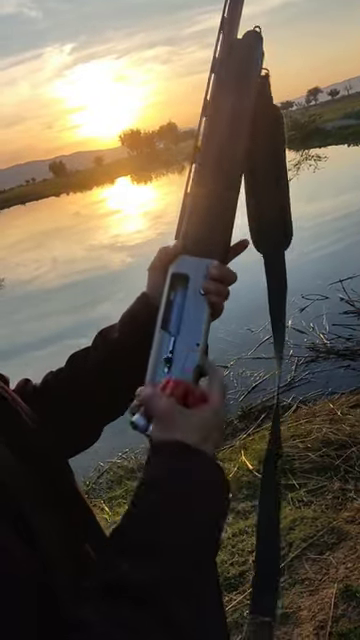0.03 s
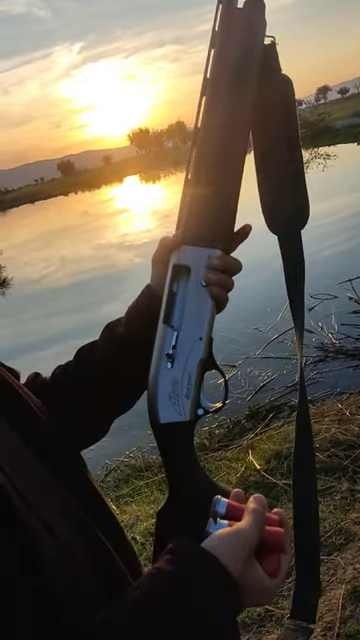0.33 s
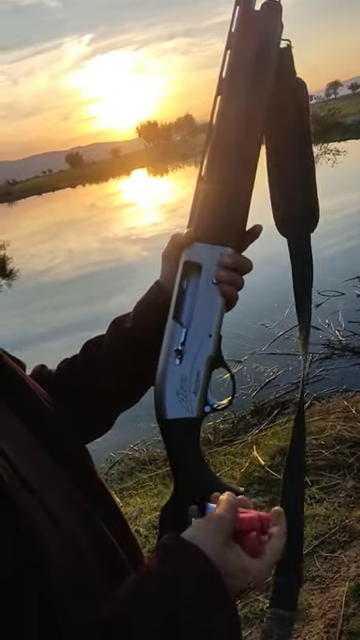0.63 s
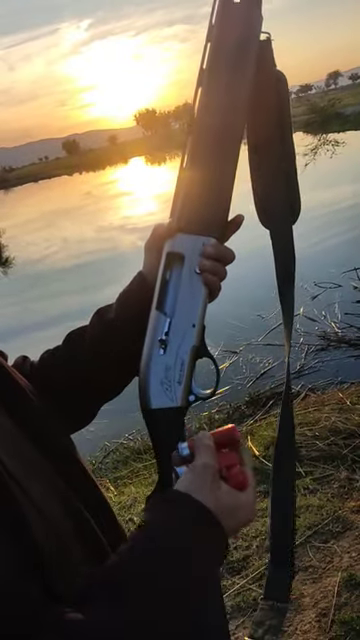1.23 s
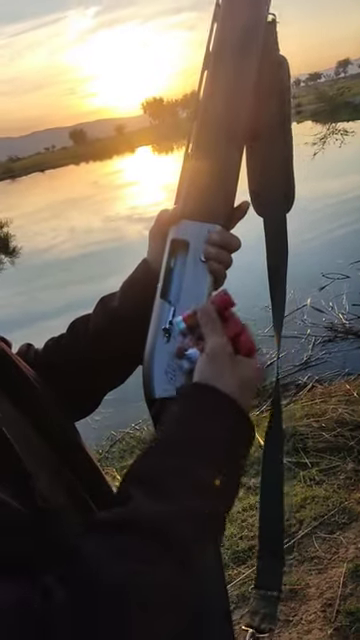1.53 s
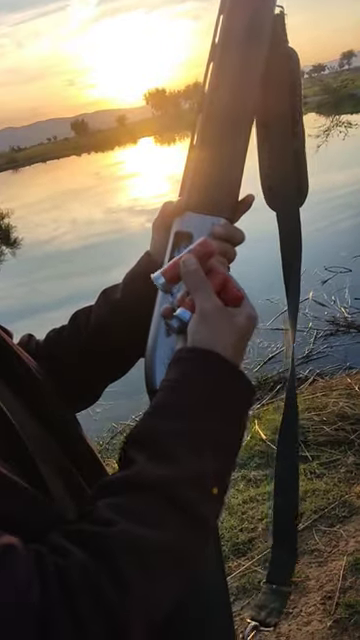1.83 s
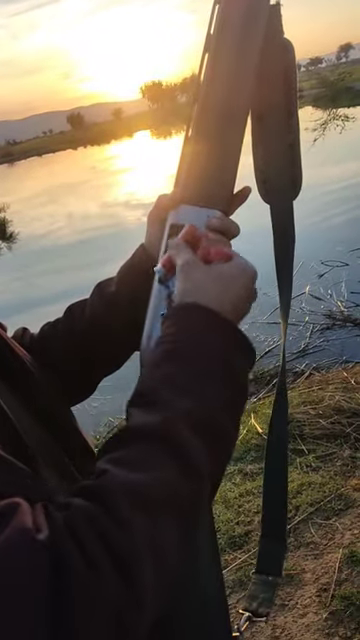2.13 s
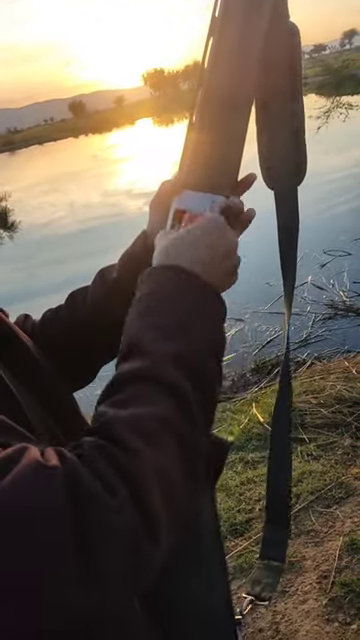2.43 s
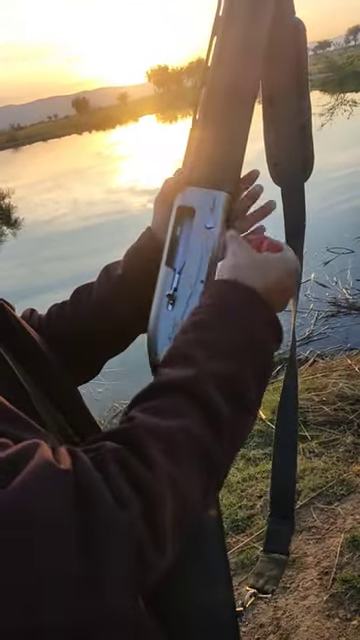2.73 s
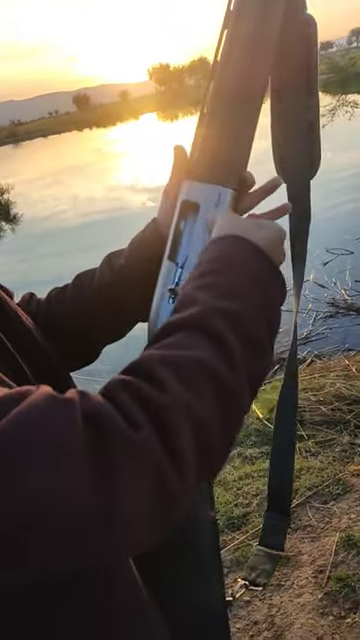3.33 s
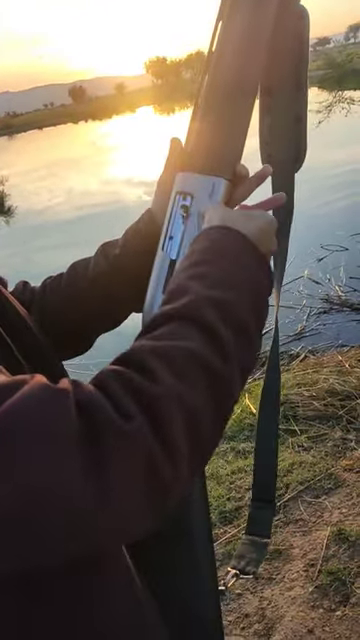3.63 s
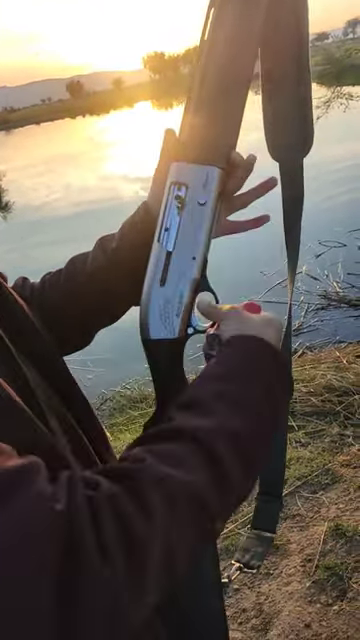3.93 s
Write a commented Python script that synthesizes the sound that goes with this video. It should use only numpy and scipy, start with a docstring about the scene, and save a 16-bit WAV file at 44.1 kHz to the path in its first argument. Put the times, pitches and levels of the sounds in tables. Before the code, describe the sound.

A shotgun being loaded outdoors: shells click lightly, then the bolt slams shut.

```python
"""A shotgun is loaded at arm's length beside a quiet lake.
First, shells click together in the hand: brass rims tick, plastic hulls clack, fingers rub.
Around 2.5 s one is pushed into the port and rattles home. At 3.5 s the bolt is released, scrapes
forward and slams shut, ringing the steel, thumping the stock and sending out a puff of air.
Faint birds call far off in the gaps, and an outdoor hush lies under it all."""
import sys
import numpy as np
from scipy import signal
from scipy.fft import rfft, irfft
from scipy.io import wavfile
from scipy.ndimage import uniform_filter1d

SR = 44100
rng = np.random.default_rng(int(sys.argv[2]) if len(sys.argv) > 2 else 0)


def dump(signal):
    """Clip the signal to [-1, 1] and save it as 16-bit WAV at the path in sys.argv[1]."""
    limited = np.clip(np.atleast_2d(signal).T, -1, 1)
    pcm = np.round(limited * 32767).astype(np.int16)
    wavfile.write(sys.argv[1], SR, pcm)


N = 176400

# shell contacts (time [s], tick level [dB], tick pitch [Hz], clack level [dB], knock level [dB],
# knock pitch [Hz], t60 [s], pan to the left [dB])
SHELL_CLICKS = [(0.0101, -20.5, 7520, -25.5, -29, 1630, 0.021, -1.5),
                (.2711, -45.5, 8000, -42.5, -42, 2420, 0.013, -2.5),
                (.325, -48.5, 7300, -63, -43.5, 2750, 0.014, 1),
                (0.4146, -34, 7900, -47.5, -46, 4180, 0.0088, 2),
                (.558, -51.5, 7400, -48.5, -50.5, 2660, .06, 0),
                (0.8899, -57, 7600, -56.5, -50, 1260, 0.022, -2),
                (0.9283, -57, 7600, -57, -55, 2900, 0.028, -1),
                (1.036, -43.5, 7600, -53, -54, 2500, 0.016, -2),
                (1.9713, -45.5, 7350, -67, -68, 1600, .008, -10),
                (2.381, -45.5, 7700, -43, -38, 1660, 0.031, -2),
                (2.4561, -36.5, 6900, -36, -37.5, 4120, 0.012, -2.5),
                (2.4713, -37, 6900, -41.5, -46, 3280, 0.013, 0),
                (2.5019, -24.5, 8400, -34, -30.5, 1740, 0.019, -3),
                (2.5253, -23.5, 6660, -32, -30.5, 1680, .023, -1),
                (2.577, -41, 7000, -50, -52, 1610, 0.025, -16),
                (2.5813, -38.5, 7940, -37, -40.5, 1590, .037, -1),
                (2.6474, -25, 6300, -32, -49.5, 1030, 0.015, -6),
                (2.6957, -38.5, 7260, -49, -51.5, 1090, 0.015, -7),
                (2.734, -44.5, 6850, -45, -40, 1060, 0.028, 2.5),
                (2.808, -56.5, 7000, -54.5, -47, 1070, 0.026, -4)]
# tone of a brass rim (frequency [Hz], gain [dB])
TICK_EQ = [(3500, -17.5), (5200, -7), (6300, 5.5), (7200, 4.5), (8600, -1.5), (9400, -11), (12500, -14.5),
           (15500, -32.5)]
# tone of a plastic hull (frequency [Hz], gain [dB])
CLACK_EQ = [(100, -36), (300, -12), (1200, -17.5), (2200, -4), (3800, -2), (5500, -4), (8000, -4.5),
            (15000, -50.5)]
TICK_WIDTH_HZ, KNOCK_WIDTH_HZ, KNOCK_STRETCH = 1450, 374, 1.6

# blows of bolt and carrier (time [s], level [dB], ping pitch [Hz], t60 [s], pan to the left [dB])
BOLT_BLOWS = [(3.5425, -37.5, 1000, .027, -7), (3.5589, -19.5, 6150, 0.03, -4.5),
              (3.5675, -26, 7500, .016, 0), (3.5751, -21, 7250, 0.011, -7), (3.5835, -23, 5200, 0.012, -3),
              (3.587, -18.5, 4340, 0.015, 2), (3.6002, -21, 7300, 0.028, -1),
              (3.6059, -21.5, 6600, 0.023, -3), (3.6147, -20.5, 7300, .016, -10),
              (3.622, -17, 3900, 0.031, 15), (3.625, -15, 1300, 0.023, 2), (3.705, -51, 8300, .07, -9)]
PING_WIDTH_HZ, PING_DB = 440, 7.5
SLIDE_S, LOCK_S, SLIDE_DB, SLIDE_RISE_DB = 3.560, 3.634, -26.5, 10.5
SLIPS_PER_S, SLIP_SPREAD_DB = 1400, 3
# tone of steel on steel (frequency [Hz], gain [dB])
STEEL_EQ = [(100, -37), (400, -17), (1000, -1), (3000, -4), (4200, 0), (5300, -6), (6200, 4), (7300, 6.5),
            (8500, -3), (10500, -10.5), (15500, -21.5)]
# resonances of the receiver (pitch [Hz], gain [dB], t60 [s])
RECEIVER_MODES = [(640, -2, .066), (1067, 0.5, .035), (1420, -7, 0.047), (2715, 2, 0.036), (7094, 9, 0.37),
                  (7150, -1, .15), (8597, 8, 0.15), (10880, 3, 0.093)]
# decay of the barrel's diffuse ring (frequency [Hz], average t60 [s])
RING_DECAY = [(1000, 0.079), (8000, 0.12)]
RING_DB, RING_SPREAD_DB, RING_LOW_HZ, TOP_HZ = -8.5, 7, 804, 15600

# heavy thumps through the stock (time [s], level [dB], t60 [s])
STOCK_THUMPS = [(0.0115, -33, 0.039), (2.5830, -44, .05), (3.5770, -30, 0.056), (3.6236, -18.5, 0.038),
                (3.6300, -17.5, 0.036)]
# tone of the stock (frequency [Hz], gain [dB])
STOCK_EQ = [(40, -25), (150, -11), (300, 0), (430, -9.5), (650, 1.5), (850, -4.5), (1350, -1.5), (2400, -1),
            (12000, -51)]
# soft bumps of the hand on the gun (time [s], level [dB])
HAND_BUMPS = [(.774, -55), (2.583, -52)]
BUMP_HZ, BUMP_WIDTH_HZ, BUMP_T60 = 205, 120, 0.15
PUFF_S, PUFF_DB, PUFF_RISE_S, PUFF_FALL_S, MIC_LOW_HZ = 3.629, -12, .005, 0.14, 3.17

# strokes of fingers and sleeve on the shells (time [s], length [s], level [dB])
RUB_STROKES = [(.36, 0.28, -60), (.87, 0.24, -55.5), (2.3, 0.36, -63)]
# tone of the rubbing (frequency [Hz], gain [dB])
RUB_EQ = [(200, -6), (800, 1), (5000, 1.5), (7800, 11.5), (10000, -22.5), (15000, -26)]

# envelope of every contact: attack, hard first snap, faint after-ring
ATTACK_S, SNAP_DB, SNAP_T60, AFTER_DB, AFTER_STRETCH = 0.00018, -1, 0.0025, -26, 4.5
# stereo image of the nearby gun (frequency [Hz], pan to the left [dB])
GUN_BALANCE = [(300, -1), (1200, 2), (2800, 4.5), (5500, -6.5), (9000, 1)]
LEFT_LAG_S, STEREO_LIKENESS = .00022, 0.65

# decay of the scatter from the bank (frequency [Hz], t60 [s])
BANK_DECAY = [(2000, 0.43), (7000, 1)]
BANK_DB, BANK_TOP_HZ = -30.5, 9000
# distant calls (time [s], length [s], start pitch [Hz], middle pitch [Hz], end pitch [Hz], level [dB])
BIRD_CALLS = [(0.614, 0.039, 650, 561, 517, -51.5), (1.22, 0.07, 517, 425, 477, -56.5),
              (2.135, 0.0454, 593, 639, 700, -55), (3.11, 0.067, 3400, 4120, 3940, -63)]
# tone of the open air (frequency [Hz], gain [dB])
AIR_EQ = [(20, 9.5), (45, -16.5), (130, -8.5), (330, -11), (550, -2), (1200, -3), (2500, -12.5),
          (5000, -16.5), (7000, -10.5), (8300, -17), (9300, -27), (10200, -42.5), (15000, -53)]
# stereo width of the open air (frequency [Hz], left-right likeness [0-1])
AIR_STEREO = [(40, 0.17), (700, 0.73), (2500, 0.097)]
AIR_DB, AIR_PATCHY_DB, AIR_SWELL_DB = -55.5, 2.5, -0.53


def shells():
    """Brass rims tick, plastic hulls clack, and the hollow they strike knocks."""
    out = np.zeros((2, N))
    for s, tick_db, tick_hz, clack_db, knock_db, knock_hz, t60, pan_db in SHELL_CLICKS:
        hollow = resonate(contact(t60 * KNOCK_STRETCH), knock_hz, KNOCK_WIDTH_HZ)
        knock = at_level(resonate(hollow, knock_hz, width_hz=knock_hz), knock_db)
        rim = resonate(contact(t60), tick_hz, TICK_WIDTH_HZ)
        tick = at_level(equalise(rim, TICK_EQ), tick_db)
        clack = at_level(equalise(contact(t60), CLACK_EQ), clack_db)
        add(out, s, pan(pan_db) * (tick + clack + knock))
    return out


def bolt():
    """Blows and a scrape of steel on steel ring the receiver and the barrel."""
    drive = np.zeros((2, N))
    for s, db, ping_hz, t60, pan_db in BOLT_BLOWS:
        blow = contact(t60)
        ping = amp(PING_DB) * resonate(blow, ping_hz, PING_WIDTH_HZ)
        add(drive, s, pan(pan_db) * at_level(blow + ping, db))
    drive += bolt_scrape()
    steel = equalise(drive, STEEL_EQ)
    for hz, db, t60 in RECEIVER_MODES:
        steel += amp(db) * resonate(drive, hz, width_hz=np.log(1000) / np.pi / t60)
    return steel + amp(RING_DB) * barrel_ring(steel)


def bolt_scrape():
    """The bolt slides forward in tiny slips, louder as it speeds up."""
    travel = (np.arange(N) / SR - SLIDE_S) / (LOCK_S - SLIDE_S)
    slips = rng.random(N) < SLIPS_PER_S / SR
    strength = amp(SLIP_SPREAD_DB * np.minimum(rng.exponential(1, N), 4))
    grit = unit_rms(stereo_noise(N) * uniform_filter1d(slips * strength, size=24))
    sliding = (travel > 0) & (travel < 1)
    return pan(db=-3.5) * grit * sliding * amp(SLIDE_DB + SLIDE_RISE_DB * np.clip(travel, 0, 1))


def barrel_ring(x, mode_count=320):
    """The many faint modes of barrel and action, each with its own pitch, strength and decay."""
    t, modes = np.arange(SR // 2) / SR, 0
    for place, strength, life, left_phase, right_phase in rng.random((mode_count, 5)):
        hz = RING_LOW_HZ + place * (TOP_HZ - RING_LOW_HZ)
        fade_db = -60 * t / (curve(RING_DECAY, hz) * (.5 + life))
        tone = np.sin(2 * np.pi * (hz * t + [[left_phase], [right_phase]]))
        modes += amp(RING_SPREAD_DB * strength + fade_db) * tone
    return convolve(x, modes / np.linalg.norm(modes[0]))


def stock():
    """The heavier blows thump through the body of the gun; the hand adds soft bumps."""
    out = np.zeros((2, N))
    for s, db, t60 in STOCK_THUMPS:
        add(out, s, pan(db=-4.5) * at_level(equalise(contact(t60), STOCK_EQ), db))
    for s, db in HAND_BUMPS:
        bump = resonate(contact(BUMP_T60), BUMP_HZ, BUMP_WIDTH_HZ)
        add(out, s, at_level(resonate(bump, BUMP_HZ, BUMP_WIDTH_HZ), db))
    return out


def puff():
    """The slam sends a slow pressure pulse into the microphone, which swings back and settles."""
    t = np.arange(SR) / SR
    pulse = -amp(PUFF_DB) * (1 - np.exp(-(t / PUFF_RISE_S) ** 2)) * np.exp(-t / PUFF_FALL_S)
    low_cut = signal.butter(2, MIC_LOW_HZ, "high", fs=SR, output="sos")
    out = np.zeros((2, N))
    add(out, PUFF_S, signal.sosfilt(low_cut, pulse))
    return out


def rubbing():
    """Soft grainy swishes as the hand turns the shells."""
    friction = stereo_noise(N) * uniform_filter1d(rng.exponential(1, N) ** 3, size=100)
    grain = unit_rms(equalise(friction, RUB_EQ))
    out = np.zeros((2, N))
    for s, length, db in RUB_STROKES:
        count = round(length * SR)
        add(out, s, amp(db) * np.hanning(count) * grain[:, round(s * SR):][:, :count])
    return out


def bank_scatter(x):
    """The bank scatters sound into a diffuse tail, each band dying at its own speed."""
    hz, t, bands = signal.stft(rng.standard_normal((2, SR // 2)), SR, nperseg=128)
    fade = amp(-60 * t / curve(BANK_DECAY, hz)[:, None])
    tail = signal.istft(bands * fade, SR, nperseg=128)[1]
    return convolve(x, tail / np.linalg.norm(tail[0]))


def birds():
    """Short, faint gliding calls from across the water."""
    out = np.zeros((2, N))
    for s, length, start_hz, middle_hz, end_hz, db in BIRD_CALLS:
        progress = np.linspace(0, 1, round(length * SR))
        glide_hz = np.polyval(np.polyfit([0, .5, 1], [start_hz, middle_hz, end_hz], 2), progress)
        waver = 1 + .015 * unit_rms(uniform_filter1d(rng.standard_normal(len(progress)), size=150))
        envelope = np.sqrt(abs(np.sin(np.pi * progress)))
        add(out, s, amp(db) * envelope * np.sin(2 * np.pi * np.cumsum(glide_hz * waver) / SR))
    return out + bank_scatter(out) / 2


def air():
    """A steady bed of outdoor hush with drifting patches and a slight swell."""
    hz, frames = np.fft.rfftfreq(1024, 1 / SR), N // 256 + 5
    a, b, c, d, patches = rng.standard_normal((frames, len(hz), 5)).T
    patches = unit_rms(uniform_filter1d(uniform_filter1d(patches, size=7, axis=0), size=9, axis=1))
    swell = unit_rms(uniform_filter1d(rng.standard_normal(frames), size=40))
    likeness = curve(AIR_STEREO, hz)[:, None]
    left = a + 1j * b
    right = likeness * left + np.sqrt(1 - likeness ** 2) * (c + 1j * d)
    gain = amp(curve(AIR_EQ, hz)[:, None] + AIR_PATCHY_DB * patches + AIR_SWELL_DB * swell)
    hush = signal.istft(np.array([left, right]) * gain, nperseg=1024, noverlap=768)[1][:, :N]
    return amp(AIR_DB) * pan(db=1.3) * unit_rms(hush)


def contact(t60, count=8192):
    """One hit: a sharp snap of noise, a quick dense decay and a faint after-ring."""
    t = np.arange(count) / SR
    attack = 1 - np.exp(-t / ATTACK_S)
    snap = amp(SNAP_DB - 60 * t / SNAP_T60)
    after_ring = amp(AFTER_DB - 60 * t / (t60 * AFTER_STRETCH))
    return stereo_noise(count) * attack * (snap + amp(-60 * t / t60) + after_ring)


def stereo_noise(count):
    """Noise partly alike on both sides, and later on the left."""
    shared, separate = rng.standard_normal((2, count))
    right = STEREO_LIKENESS * shared + np.sqrt(1 - STEREO_LIKENESS ** 2) * separate
    return np.array([np.roll(shared, round(LEFT_LAG_S * SR)), right])


def resonate(x, hz, width_hz):
    """One resonance with a peak gain near 1."""
    r = np.exp(-np.pi * width_hz / SR)
    return 2 * signal.lfilter([1 - r], [1, -r * np.exp(2j * np.pi * hz / SR)], x + 1e-18).real


def equalise(x, eq, size=4096):
    """Minimum-phase EQ, so nothing rings ahead of a hit."""
    log_gain = np.log(amp(curve(eq, abs(np.fft.fftfreq(size, 1 / SR)))))
    taps = np.fft.ifft(np.exp(np.conj(signal.hilbert(log_gain)))).real[:size // 2]
    return convolve(x, taps[None])


def at_level(x, db):
    """Sets a hit's level in each channel, as if all its energy fell within 10 ms."""
    return amp(db) * x / np.sqrt(np.sum(x ** 2, axis=1, keepdims=True) / (.01 * SR))


def pan(db):
    """Left and right gains for a level difference; positive leans left."""
    return unit_rms(amp([[db / 2], [-db / 2]]))


def curve(points, hz):
    """Reads a table along a log frequency axis."""
    point_hz, value = np.transpose(points)
    return np.interp(np.log(hz + 1), np.log(point_hz), value)


def convolve(x, taps):
    return signal.fftconvolve(x, taps, axes=1)[:, :x.shape[1]]


def add(mix, s, sound):
    part = mix[:, round(s * SR):][:, :sound.shape[-1]]
    part += sound[..., :part.shape[1]]


def amp(db):
    return 10 ** (np.asarray(db) / 20)


def unit_rms(x):
    return x / np.sqrt(np.mean(x ** 2) + 1e-20)


def scene():
    """The gun close by, a faint scatter from the bank, and the lakeside behind."""
    gun = shells() + bolt() + stock()
    side_db = curve(GUN_BALANCE, np.fft.rfftfreq(N, 1 / SR)) / 2
    gun = irfft(rfft(gun) * amp([side_db, -side_db]), N)
    bank_send = signal.sosfilt(signal.butter(4, BANK_TOP_HZ, fs=SR, output="sos"), gun)
    return gun + amp(BANK_DB) * bank_scatter(bank_send) + puff() + rubbing() + birds() + air()


def record(dry):
    """A steep high cut on the whole mix."""
    high_cut = signal.firwin(511, TOP_HZ, window=("kaiser", 9), fs=SR)
    return signal.oaconvolve(dry, high_cut[None], "same")


dry = scene()
out = record(dry)
dump(out)
```